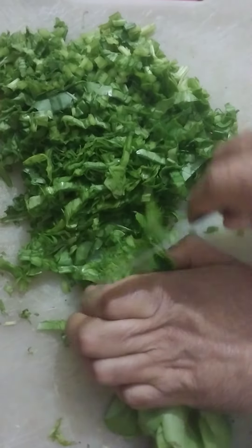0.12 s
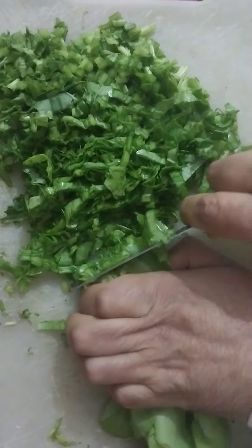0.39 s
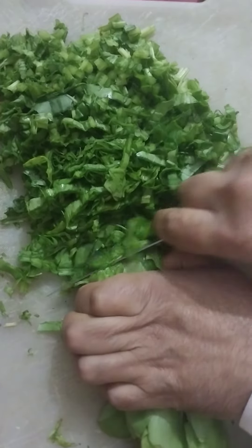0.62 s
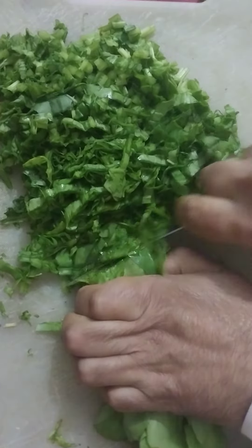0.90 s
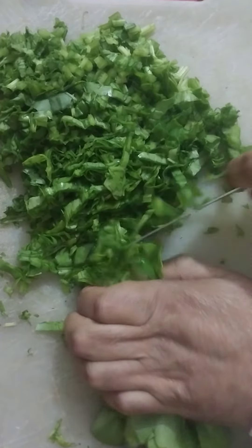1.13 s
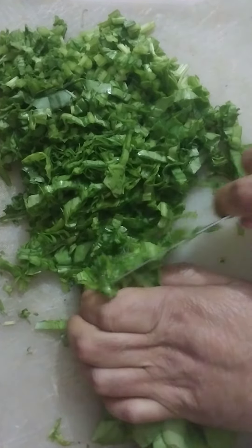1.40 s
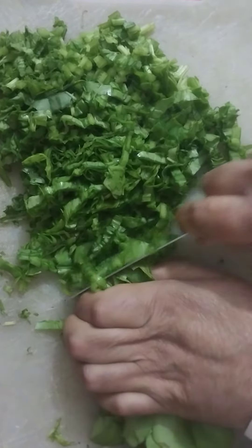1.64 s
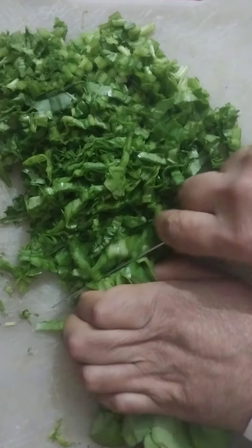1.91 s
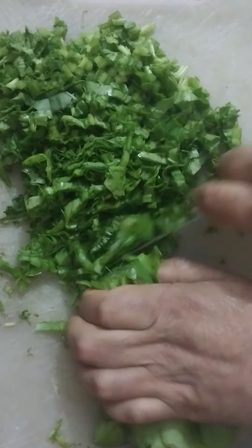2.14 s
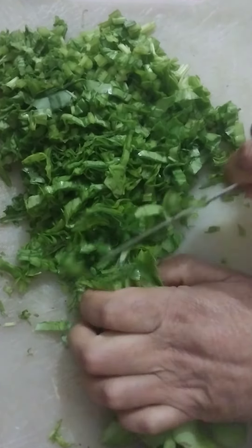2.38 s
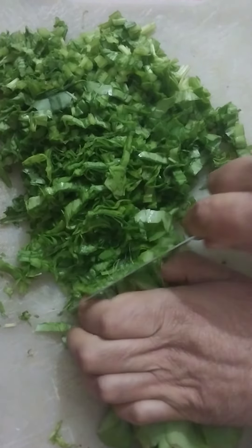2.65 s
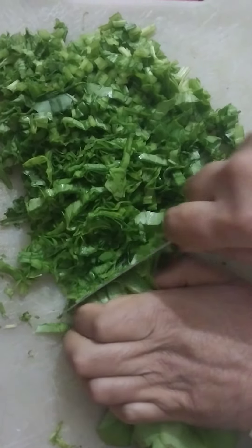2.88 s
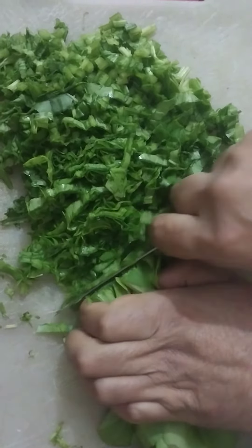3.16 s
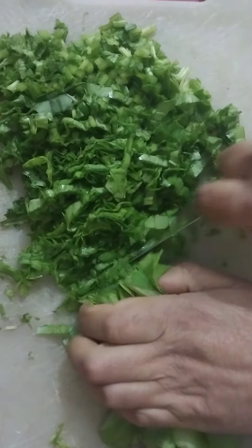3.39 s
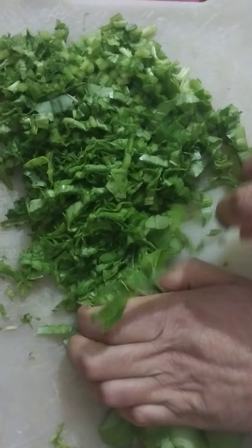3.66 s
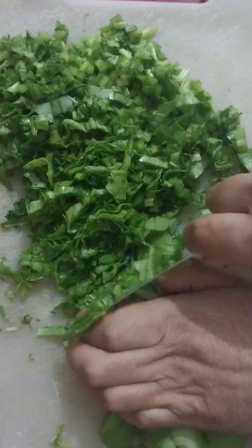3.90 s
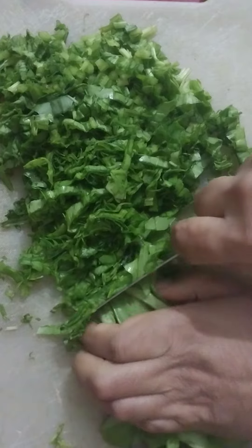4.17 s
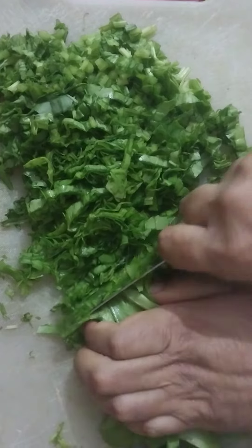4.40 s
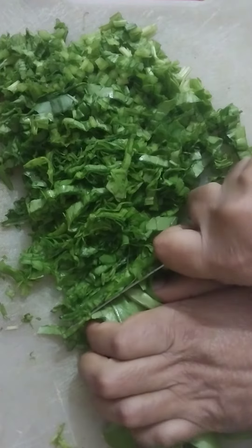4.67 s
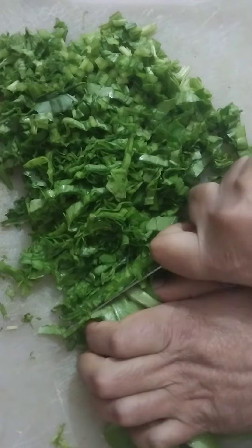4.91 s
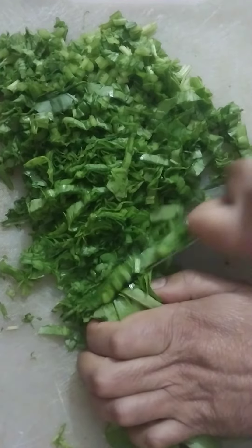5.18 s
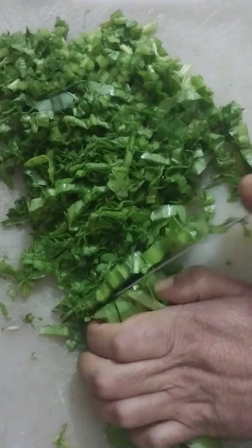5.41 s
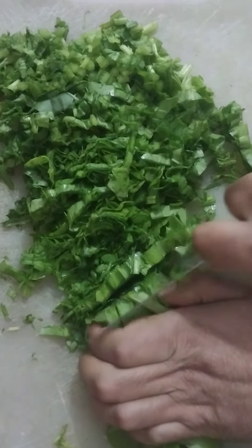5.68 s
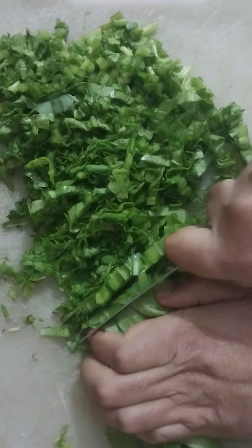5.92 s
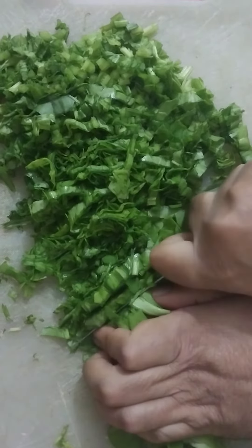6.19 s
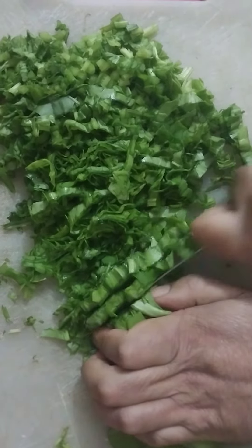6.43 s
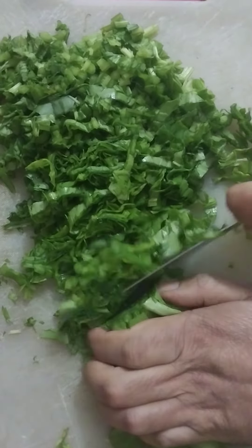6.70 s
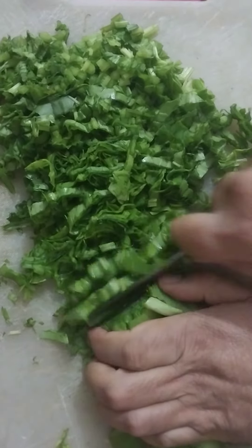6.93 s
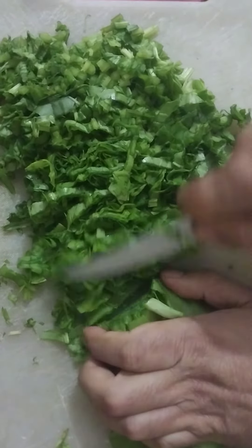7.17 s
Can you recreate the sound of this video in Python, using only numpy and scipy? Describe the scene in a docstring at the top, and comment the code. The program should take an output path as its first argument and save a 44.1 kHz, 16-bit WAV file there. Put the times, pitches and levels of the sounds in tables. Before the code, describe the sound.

A close stereo pickup of a knife cutting leafy greens on a plastic board in a small room. A brief snip at 0 s leads into soft tearing, swelling with stem pops and dull knocks around 0.5-0.7 s. Short crisp strokes follow at 0.8-1.1, 1.5-1.8 and 1.9-2.2 s, then a lull. At 2.8-3.4 s snaps and knocks return, with a firm thud at 3.0. After another quiet gap, crunchy slicing runs from 4.0 to 4.5 s. Dense snapping from 4.85 s bursts into the loudest sharp crack and board blow at 5.0, trailing small crackles to 5.3. Sparse rustle follows, then hard juicy crunches at 5.9-6.3 s with a heavy, dull thump at 6.16. Lighter cuts end near 6.6; a last rasp rises at 7.3. Faint hum continues throughout; low, lumpy air gusts flutter on the left, notably at 0.4, 1.55, 2.9, 4.1 and 5.9 s.

```python
"""A knife is drawn through a bundle of leafy greens: fibres tear as dense clicks in clumps, and stems
snap as short bursts of noise, each with its own pitch. The blade thuds on a plastic board, where
short pushes set a handful of tones ringing. Echoes from the room follow, over a steady hum of
filtered noise, and a draught of lumpy low noise and swinging eddies buffets the left microphone port."""
import sys
import numpy as np
from scipy import signal
from scipy.fft import rfft, irfft, next_fast_len
from scipy.io import wavfile

SR = 44100
rng = np.random.default_rng(int(sys.argv[2]) if len(sys.argv) > 2 else 0)


def to_wav(sig):
    """Store sig (one row per channel, or 1-D mono) as 16-bit WAV at the path in sys.argv[1].

    Samples outside -1..1 are clipped; the rate is SR.
    """
    pcm = np.clip(np.atleast_2d(sig), -1, 1) * 32767
    pcm = np.round(pcm).astype(np.int16)
    wavfile.write(sys.argv[1], SR, pcm.T)  # frames by channels


def voltage_ratio(level):
    """Linear amplitude factor for a level in decibels (scalar or array-like)."""
    return 10 ** (np.asarray(level, float) / 20)


N = 322371   # length of the scene in samples


def rms_one(x):
    """Scale to an rms (average strength) of 1."""
    return x / np.sqrt(np.mean(x ** 2) + 1e-20)


def at_hz(points, size):
    """Read a spectrum table at the bins of an FFT, with straight lines over log frequency."""
    hz = np.maximum(np.arange(size // 2 + 1) * SR / size, 1)
    table_hz, values = np.transpose(points)
    return np.interp(np.log(hz), np.log(table_hz), values)


def coloured(x, points):
    """Filter by a spectrum table, scaled so that white noise keeps its power."""
    size = next_fast_len(N + 4096)
    gain = rms_one(voltage_ratio(at_hz(points, size)))
    return irfft(rfft(x, size) * gain, size)[..., :N]


def cut(x, hz, kind, order=2):
    """Butterworth filter: "low" keeps what is below hz, "high" what is above."""
    sos = signal.butter(order, hz, kind, fs=SR, output="sos")
    return signal.sosfilt(sos, x + 1e-18)


def drift(rate_hz):
    """Random wander of spread 1, made from noise with the fast changes filtered out."""
    noise = rng.standard_normal(N + SR)
    return rms_one(cut(noise, rate_hz, "low")[SR:])   # the first second lets the filter settle


def add(track, start_s, piece):
    """Mix a short piece into a track from a given time on."""
    i = int(np.clip(round(start_s * SR), 0, N - 1))
    track[i:i + len(piece)] += piece[:N - i]


def at_random(level_db, count, over_db, spread_db, low_hz, high_hz):
    """Events at chance times, as strong as their moment: rows of (s, dB, Hz, sample, spare draw)."""
    when, pitch = rng.random((count, 2)).T
    size, spare = rng.standard_normal((count, 2)).T
    i = (when * N).astype(int)
    event_db = level_db[i] + over_db + spread_db * size
    event_hz = low_hz * (high_hz / low_hz) ** pitch
    return np.array([i / SR, event_db, event_hz, i, spare]).T


# colour of the room hum: (frequency [Hz], relative level per Hz [dB])
HUM_COLOUR = [(20, -45), (50, 2), (80, -40), (100, 4.5), (135, -4), (205, -4), (330, -6.5), (500, -6.5),
              (810, -9), (1030, -13), (2300, -21), (3600, -22), (5400, -32.5), (8240, -56), (11000, -31),
              (16400, -39)]
# how alike the hum is left and right: (frequency [Hz], likeness [0 to 1, lower values count as 0])
HUM_ALIKE = [(60, 0.71), (240, 1), (950, 0.22), (3770, 0.081), (15000, -3.3)]


def hum():
    """Steady room noise, most alike at both ports in the bass and unrelated in the treble."""
    alike = np.clip(at_hz(HUM_ALIKE, size=N), 0, 1)
    mid, side = rfft(rng.standard_normal((2, N)))
    shared, opposed = np.sqrt(1 + alike) * mid, np.sqrt(1 - alike) * side
    pair = irfft(shared + opposed * [[1], [-1]], N)
    return voltage_ratio(-44) * coloured(rms_one(pair), HUM_COLOUR)


# strength of the draught on the left port: (time [s], level [dB])
DRAUGHT_LEVEL = [(0.0, -38.5), (0.15, -48), (0.35, -30.5), (0.65, -43), (0.9, -56), (1.2, -44), (1.6, -36),
                 (1.85, -45), (2.1, -50), (2.5, -29), (2.7, -47), (2.9, -25), (3.15, -45), (3.6, -32.5),
                 (3.8, -40), (4.25, -35), (4.5, -41.5), (4.65, -62), (4.95, -51), (5.35, -33.5), (6.1, -47),
                 (6.3, -49), (6.6, -38), (7.05, -48.5), (7.31, -34.5)]
# strong eddies on the left port: (time of the middle [s], level [dB], pitch in the middle [Hz])
STRONG_EDDIES = [(0.248, -21, 110), (0.316, -21, 168), (0.352, -18.5, 161), (0.401, -16, 148),
                 (0.471, -18.5, 180), (0.496, -16.5, 112), (1.113, -23.5, 142), (1.24, -20.5, 130),
                 (1.54, -9, 274), (1.549, -14, 207), (1.56, -11.5, 148), (1.577, -18, 91.5),
                 (1.604, -17, 130), (1.853, -22.5, 146), (2.366, -22.5, 166), (2.445, -21, 92),
                 (2.475, -21, 132), (2.625, -16.5, 129), (2.762, -23.5, 114), (2.867, -14, 116),
                 (2.922, -24.5, 189), (3.467, -22, 130), (3.615, -18, 198), (3.652, -16, 136),
                 (3.938, -20.5, 144), (3.981, -21, 132), (4.113, -11.5, 174), (4.202, -17, 117),
                 (4.43, -23, 119), (5.509, -32, 120), (5.673, -20.5, 173), (5.872, -15, 179),
                 (5.948, -22.5, 122), (6.54, -25, 120), (6.56, -24.5, 119), (7.216, -15.5, 122),
                 (7.302, -23, 152)]
# colour of the draught noise: (frequency [Hz], relative level per Hz [dB])
DRAUGHT_NOISE = [(15, -34), (30, -7), (55, 11.5), (110, 5.5), (200, 2.5), (350, -12.5), (700, -81)]


def draught():
    """Lumpy low noise, and single eddies that swing a few cycles with falling pitch."""
    level_s, level_points = np.transpose(DRAUGHT_LEVEL)
    level_db = np.interp(np.arange(N) / SR, level_s, level_points)
    lumps_db = 4.6 * drift(13.4)
    left = voltage_ratio(level_db + lumps_db) * coloured(rng.standard_normal(N), DRAUGHT_NOISE)
    weak = at_random(level_db, 90, over_db=10, spread_db=1.5, low_hz=84.7, high_hz=157)
    eddies = STRONG_EDDIES + list(weak[:, :3])
    phases = rng.uniform(0, 2 * np.pi, len(eddies))
    for (middle_s, db, hz), phase in zip(eddies, phases):
        cycles = np.arange(-3 * SR / hz, 3 * SR / hz) * hz / SR
        swell = np.exp(-(cycles / 0.95) ** 2)
        swing = swell * np.sin(2 * np.pi * (cycles - 0.15 * cycles ** 2) + phase)
        add(left, middle_s - 3 / hz, voltage_ratio(db) * swing)
    # the right port is sheltered: weaker noise of its own
    right = voltage_ratio(level_db - 14.5) * coloured(rng.standard_normal(N), DRAUGHT_NOISE)
    return np.array([left, right])


# knife strokes through the bundle, and the dull echo that trails the hardest crack, at 5.003 s:
# (start [s], end [s], level at the start [dB], level at the end [dB],
# brightness: treble against the rest [dB])
STROKES_AND_ECHO = [(0.03, 0.07, -47.5, -54, -3), (0.185, 0.422, -55.5, -60.5, -1),
                    (0.418, 0.679, -56.5, -39.5, -4), (0.812, 0.952, -47, -46, -2),
                    (0.964, 1.154, -55, -56, -5.5), (1.462, 1.57, -57, -52, -2),
                    (1.634, 1.812, -45.5, -41, 1.5), (1.938, 2.05, -44, -57, 0),
                    (2.109, 2.175, -42, -46, 1), (2.22, 2.336, -61, -59.5, -12),
                    (2.64, 2.92, -64.5, -51, -1.5), (2.96, 3.053, -44, -43, -4),
                    (3.212, 3.402, -54.5, -45, -4), (3.887, 4.003, -66, -61, -3),
                    (4.014, 4.33, -55, -52.5, -3.5), (4.366, 4.472, -44.5, -47, -1.5),
                    (4.856, 4.9, -62, -68, 5), (4.962, 4.964, -31.5, -59, -4),
                    (4.995, 4.995, -31.5, -29.5, -11.5), (5.003, 5.124, -41, -48.5, -22),
                    (5.12, 5.307, -51, -53.5, -2.5), (5.74, 5.96, -68, -57, 1.5),
                    (6.004, 6.02, -41.5, -43, -2), (6.075, 6.081, -30.5, -40.5, -7),
                    (6.128, 6.139, -44, -34, -14), (6.258, 6.3, -40, -48.5, -9),
                    (6.35, 6.616, -51.5, -51, -5), (6.89, 7.09, -62, -65, -7), (7.3, 7.325, -57, -33, -8)]


def strokes():
    """Level and brightness over time: each stroke (or the echo) sets in, swells or fades, and dies."""
    t = np.arange(N) / SR
    bite_db_per_s, let_go_db_per_s = 600, 256
    rustle_db, rustle_bright_db = -65.5, -22   # the bundle shifting between strokes
    low_power, top_power = voltage_ratio(2 * rustle_db), voltage_ratio(2 * (rustle_db + rustle_bright_db))
    for start, end, start_db, end_db, bright_db in STROKES_AND_ECHO:
        db = np.interp(t, [start, max(end, start)], [start_db, end_db])
        db = db - bite_db_per_s * np.maximum(start - t, 0)
        db = db - let_go_db_per_s * np.maximum(t - end, 0)
        low_power = low_power + voltage_ratio(2 * db)
        top_power = top_power + voltage_ratio(2 * (db + bright_db))
    return 10 * np.log10(low_power), 10 * np.log10(top_power / low_power)


# places along the blade, one per row: (how much sooner the left port hears it [s])
PLACE_LEADS = [.00011, .00018, .00023, .00030, .00039]


def tearing(per_s, clump_db, spread_db):
    """Fibres part as dense clicks of uneven size at several places, giving way in clumps."""
    shape = (len(PLACE_LEADS), N)
    clicks = rng.random(shape) < per_s / SR
    sizes = voltage_ratio(spread_db * np.minimum(rng.exponential(1, shape), 5))
    signs = rng.choice([-1, 1], shape)
    return rms_one(clicks * sizes * signs * voltage_ratio(clump_db * drift(54.5)))


# thick stems snapping: (time [s], level before the crack gains [dB], pitch [Hz],
# brightness of the treble [dB], jolt to the board over the level [dB])
THICK_STEMS = [(0.0408, -30, 5700, 1, -7), (0.5642, -33, 1780, 2, 9), (0.635, -33, 5600, -1, 8),
               (0.6442, -35, 2400, -2, -7), (0.674, -36, 2500, -7, 20.5), (0.6837, -31, 6200, -18, 1),
               (0.9125, -37, 2200, -4, 14.5), (0.9292, -29.5, 2200, -3, 8.5), (1.0456, -33, 6100, -7, 7),
               (1.592, -32, 6000, -17, 4), (1.618, -33.5, 5700, -4, 10), (1.6972, -43, 6700, 4, 20),
               (1.7132, -37.5, 2480, 2, 19), (1.7536, -30, 2480, 2, 6), (1.9377, -26.5, 4160, -1, 6),
               (1.9575, -34, 5400, -18, -9), (2.1126, -33, 1770, 0, 6), (2.1665, -27.5, 5640, -4, 2),
               (2.8256, -41.5, 5200, 11, -6), (2.8385, -32, 5130, -22, 6), (2.907, -33, 4340, -5, 5),
               (2.9646, -21, 3900, -25, 2), (3.009, -28, 4000, -7, 10), (3.0414, -31, 5600, -3, 7),
               (3.0811, -40, 4800, 4, 19), (3.1406, -30.5, 5200, -22, -2), (3.19, -36.5, 5000, -8, 11),
               (3.2121, -39.5, 5700, -9, 11), (3.2656, -35.5, 5600, -4, 12), (3.3201, -30, 5300, -2, 13),
               (3.3593, -28.5, 1780, -1, 6), (3.3937, -26.5, 1750, -2, 2), (4.056, -33.5, 4300, -27, -8),
               (4.1514, -35, 4750, -18, -7), (4.279, -25.5, 4460, -16, 1.5), (4.3024, -30, 1890, -10, -6),
               (4.3597, -28, 4500, -5, -5), (4.3758, -27, 4800, -13, -12), (4.3915, -24, 4500, -13, -3),
               (4.4057, -44, 4870, -10, -12), (4.439, -27, 5170, -11, -7), (4.4746, -30.5, 5000, -4, 0),
               (4.739, -35.5, 5240, -16, -18), (4.869, -35, 4800, -18, -2), (4.879, -30, 5200, -13, -3),
               (4.9005, -38, 4700, -6, -3), (4.9445, -25, 4300, -8, -9), (4.9503, -21.5, 4300, -5, -5),
               (4.956, -20.5, 5000, -6, 11), (4.9634, -28, 2800, -22, 3), (4.9873, -26, 4600, -1, -5),
               (5.0013, -12, 3850, -14, 11.5), (5.016, -32, 4500, -24, -2), (5.033, -37, 3900, -22, -7),
               (5.1204, -29.5, 4840, -7, -13), (5.149, -29.5, 4800, 0, -19), (5.1928, -35.5, 5030, -1, -5),
               (5.2161, -35, 5700, -9, -9), (5.2546, -33.5, 4900, 7, -10), (5.2634, -34.5, 6900, 4, -2),
               (5.549, -43, 6000, -15, -5), (5.8939, -28, 2040, -15, -7), (5.9682, -33, 5200, -7, -14),
               (5.9891, -22.5, 4540, -10, 5), (6.007, -22, 4270, -14, 5), (6.022, -30.5, 3230, -8, 9),
               (6.0499, -24.5, 3220, -5, 10.5), (6.073, -33, 2500, -3, 12), (6.0894, -31, 6000, -1, 14.5),
               (6.1138, -23.5, 2300, -5, 6), (6.1243, -23.5, 4700, -9, 3), (6.1495, -26.5, 4040, -9, 11.5),
               (6.1635, -28, 2200, -7, 12.5), (6.2611, -24, 4720, -9, 1), (6.2806, -30, 5000, -19, -5),
               (6.3244, -30.5, 4230, -9, -15), (6.5961, -31.5, 3460, -24, 16), (6.612, -35, 3400, -18, 13)]


def snapping(tear_db, bright_db):
    """A stem gives way in a few ms: a noise burst, stronger at its own pitch, that jolts the board."""
    thin = at_random(tear_db, 260, over_db=9, spread_db=2.5, low_hz=2500, high_hz=6000)
    stems = list(THICK_STEMS)
    for s, db, hz, i, spare in thin:
        stems.append((s, db, hz, bright_db[int(i)] + 0.5 * spare, 11.5))
    crack_db, crack_top_db = 9.5, 20.5   # gains for the low part and for the treble
    places = len(PLACE_LEADS)
    low, top, jolts = np.zeros((places, N)), np.zeros((places, N)), np.zeros(N)
    t = np.arange(600) / SR
    cracks = rng.standard_normal((len(stems), places, len(t))) * np.exp(-t / 0.0024)
    cracks /= np.sqrt(np.sum(cracks ** 2, axis=2, keepdims=True))
    top_fade = np.exp(-t / 0.0034)   # the treble of a crack dies sooner
    push = np.exp(-t / 0.00011)   # the push on the board is brief
    push /= np.sum(push)
    for (s, db, hz, top_db, jolt_db), crack in zip(stems, cracks):
        rung = crack + 2.83 * signal.lfilter(*signal.iirpeak(hz, 4.0, SR), crack)
        for place in range(places):
            add(low[place], s, voltage_ratio(db + crack_db) * rung[place])
            add(top[place], s, voltage_ratio(db + top_db + crack_top_db) * crack[place] * top_fade)
        add(jolts, s, -voltage_ratio(db + jolt_db) * push)
    return low, top, jolts


# colour of torn leaf: (frequency [Hz], relative level per Hz [dB])
LEAF_COLOUR = [(300, -34), (700, 0), (1500, 4), (2800, 2), (4400, 2), (6500, -2), (9900, 2), (12900, 12.5),
               (15300, 10), (16600, -17)]


def leaves():
    """Tearing and snapping share the leaf's colour; also returns the force of cutting on the board."""
    tear_db, bright_db = strokes()
    fibres = tearing(1800, clump_db=2.5, spread_db=4.0)
    low, top = voltage_ratio(tear_db) * fibres, voltage_ratio(tear_db + bright_db) * fibres
    # thick, dull-cutting layers crunch in a band: the duller, the louder
    crunch = signal.lfilter(*signal.iirpeak(3900, 2.45, SR), low)
    low = low + voltage_ratio(-14 - 0.8675 * bright_db) * crunch
    snap_low, snap_top, jolts = snapping(tear_db, bright_db)
    split_hz = 8300   # the treble above this follows its own brightness
    crisp = cut(coloured(low + snap_low, LEAF_COLOUR), split_hz, "low", order=4)
    crisp += cut(coloured(top + snap_top, LEAF_COLOUR), split_hz, "high", order=4)
    force = voltage_ratio(tear_db - 12) * fibres[0] + cut(jolts, 398, "high")
    return crisp, force


def ring(force, hz, t60):
    """A click of size 1 sets a sine of height 1 ringing; it falls by 60 dB in t60 seconds."""
    r, w = voltage_ratio(-60 / (t60 * SR)), 2 * np.pi * hz / SR
    return signal.lfilter([0, np.sin(w)], [1, -2 * r * np.cos(w), r * r], force + 1e-18)


# blade on board: (time [s], level [dB], rough contact time [ms])
BLADE_THUDS = [(0.531, -26, 0.79), (0.5679, -23, 2.3), (0.6436, -19.5, 1.6), (0.6819, -13, 1.34),
               (0.821, -24, 0.82), (0.913, -24.5, 1.3), (0.931, -28, 1.3), (1.6534, -25, 1.1),
               (1.7552, -25, 2.9), (1.801, -16, 1.9), (1.938, -19, 2.1), (2.1687, -30, 1.1),
               (2.976, -21, 2), (3.0113, -12.5, 2.4), (3.04, -18, 2.2), (3.0811, -26, 0.41),
               (4.4779, -23, 2.3), (4.9586, -17, 0.69), (4.969, -25, 2.7), (4.993, -22, 1.4),
               (4.9998, -2.5, 2.97), (5.016, -23, 3.6), (5.031, -44, 2), (5.991, -31, 1.3),
               (6.0122, -19.5, 2.7), (6.0508, -19.5, 1.3), (6.074, -20, 0.54), (6.1629, -2, 6.4),
               (6.5938, -33, 0.65)]
# tones of the board: (frequency [Hz], level [dB], time to fall by 60 dB [s])
BOARD_TONES = [(103, -8.5, 0.1), (141, -20, 0.059), (209.4, -5.5, 0.064), (262.7, -5.5, 0.042),
               (303, -14.5, 0.016), (655, -10, 0.014), (814, -7, 0.0054), (1280, -12, 0.003),
               (2170, -19, 0.031), (4150, -12, 0.0049)]


def board(force):
    """Blade blows are half-sine pushes; they and the cutting force ring the same tones."""
    out = np.zeros(N)
    draws_db = rng.normal(0, 1.5, (len(BLADE_THUDS), len(BOARD_TONES)))   # no two blows ring alike
    for k, (hz, level_db, t60) in enumerate(BOARD_TONES):
        blows = force.copy()
        for (s, db, contact_ms), draw_db in zip(BLADE_THUDS, draws_db[:, k]):
            samples = 3 + int(max(contact_ms, 0) * SR / 1000)
            push = np.sin(np.linspace(0, np.pi, samples))
            add(blows, s, -voltage_ratio(db + draw_db) * push / push.sum())
        out += voltage_ratio(level_db) * ring(blows, hz, t60)
    return out


def room(x):
    """Echoes from six feedback delays a side, duller on every round."""
    t60_s, wall_cut_hz = 0.45, 9000
    size = next_fast_len(N + SR)
    w = np.arange(size // 2 + 1) * 2 * np.pi / size
    dull = 1 / (1 + 1j * w * SR / (2 * np.pi * wall_cut_hz))
    echoes = []
    for k, lag_s in enumerate(rng.uniform(0.011, 0.04, 12)):
        one_round = voltage_ratio(-60 * lag_s / t60_s) * dull * np.exp(-1j * w * lag_s * SR)
        echoes.append((-1) ** (k // 2) * one_round / (1 - one_round))   # the sum of all rounds
    sides = np.array([sum(echoes[::2]), sum(echoes[1::2])])
    return irfft(rfft(x, size) * sides, size)[:, :N]


def to_ports(x, lead_s):
    """The right port hears the same sound a little later than the left."""
    t = np.arange(N)
    return np.array([x, np.interp(t - lead_s * SR, t, x)])


def scene():
    """Leaves and board near the microphone, with room echoes, hum and draught."""
    crisp, force = leaves()
    knocks = cut(board(force), 104, "high", order=3)
    # long waves wrap round the housing and reach both ports almost together
    mids = cut(crisp, 2100, "low")
    near = to_ports(knocks + mids.sum(axis=0), 0.00009)
    for x, lead_s in zip(crisp - mids, PLACE_LEADS):
        near = near + to_ports(x, lead_s)
    echoes = voltage_ratio(-20.5) * room(crisp.sum(axis=0) + knocks)
    return near + echoes + hum() + draught()


# how the ports differ: (frequency [Hz], left over right [dB])
PORT_DIFFERENCE = [(300, 0), (700, -.5), (1290, 1.2), (2380, -1.8), (4400, -2.5), (8120, -1), (12000, 2),
                   (15000, 1)]
# a cavity behind both ports, and the top cut: (frequency [Hz], level [dB])
PORT_CAVITY = [(7000, 0.5), (7900, -10), (8400, -16), (9000, -10.5), (10000, -6.5), (16200, -12),
               (16800, -45)]


def ports(x):
    """The two ports differ in colour and share a narrow dip and a loss at the very top."""
    half_db = at_hz(PORT_DIFFERENCE, size=N) / 2   # added on the left, taken away on the right
    gain = voltage_ratio(half_db * np.array([[1], [-1]]) + at_hz(PORT_CAVITY, size=N))
    return irfft(rfft(x) * gain, N)


def roll_off(x):
    """The treble ends steeply here."""
    return signal.sosfilt(signal.butter(12, 16510, fs=SR, output="sos"), x)


def record(dry):
    """The scene as picked up through the two microphone ports."""
    mix = ports(dry)
    return roll_off(mix)


dry = scene()
out = record(dry)
to_wav(out)
```